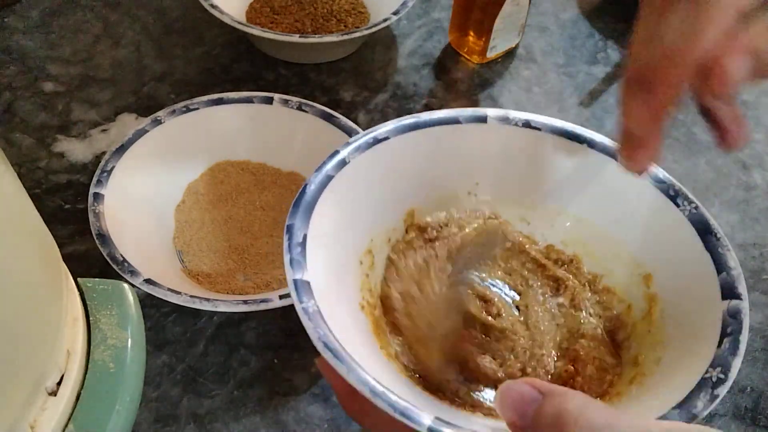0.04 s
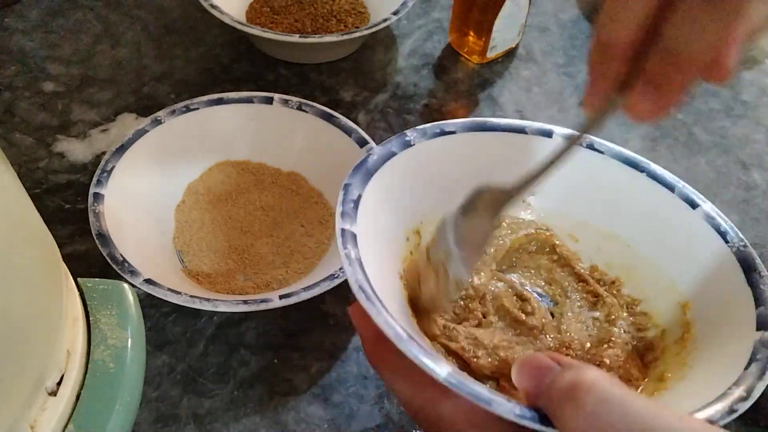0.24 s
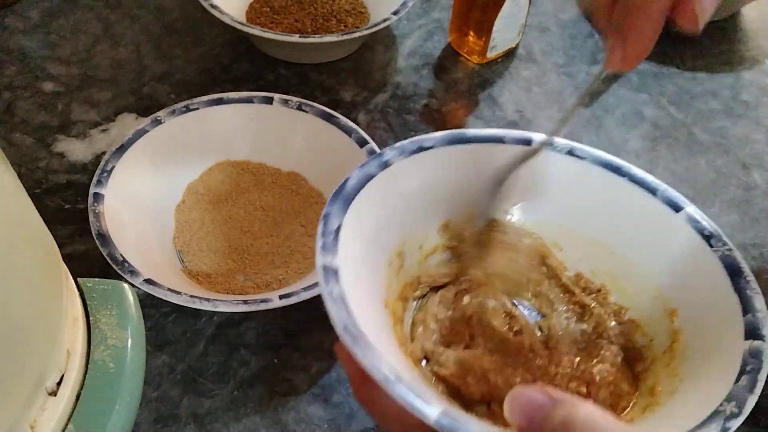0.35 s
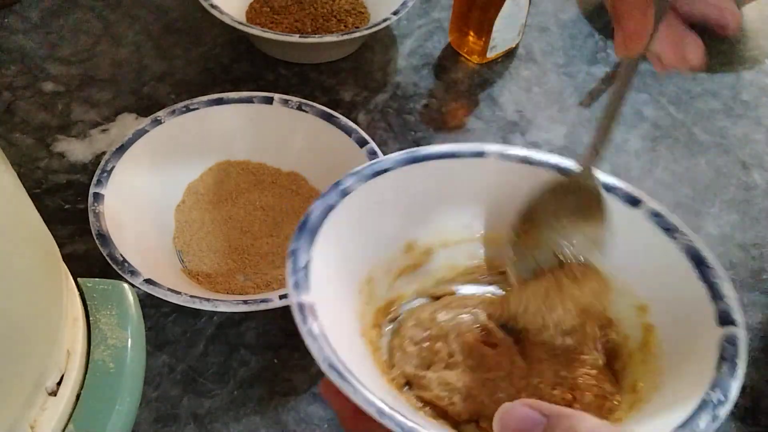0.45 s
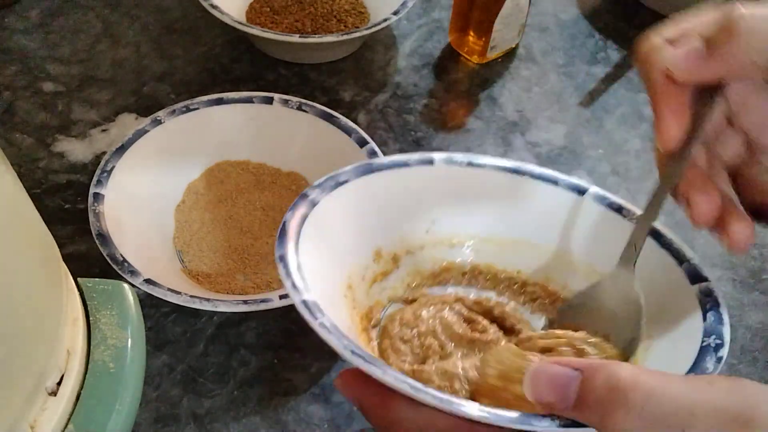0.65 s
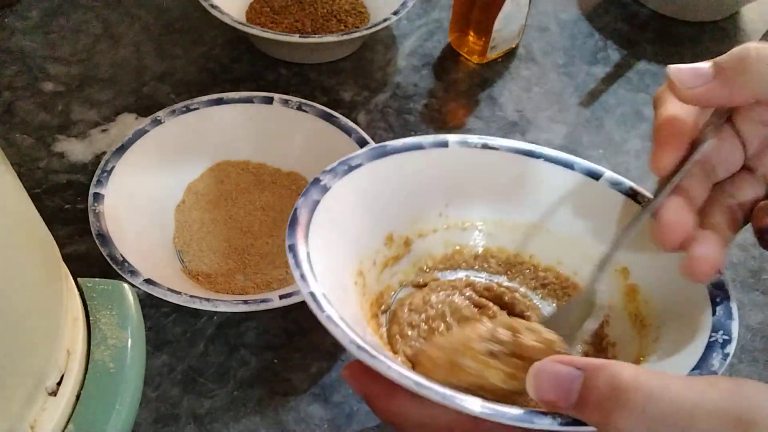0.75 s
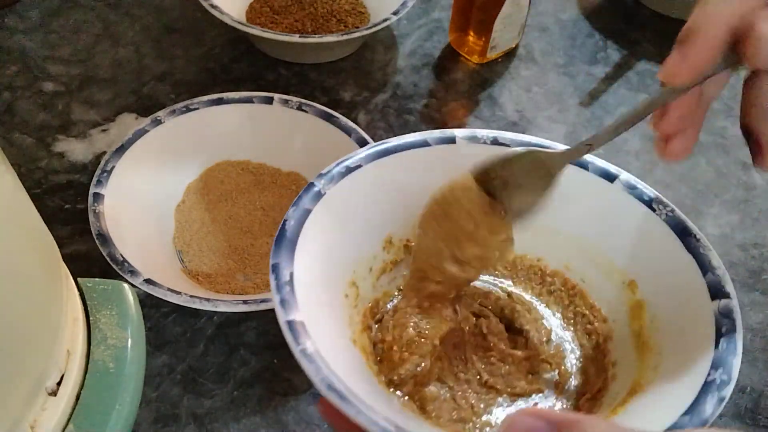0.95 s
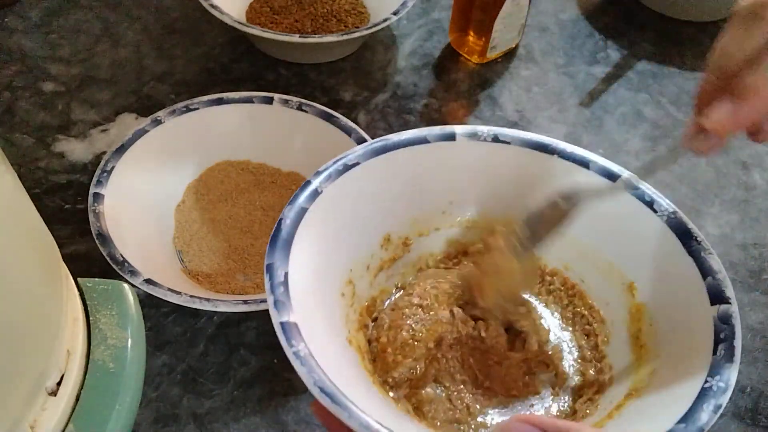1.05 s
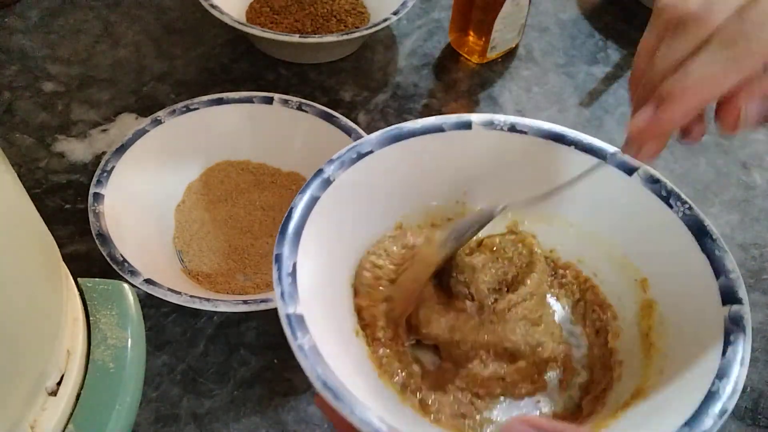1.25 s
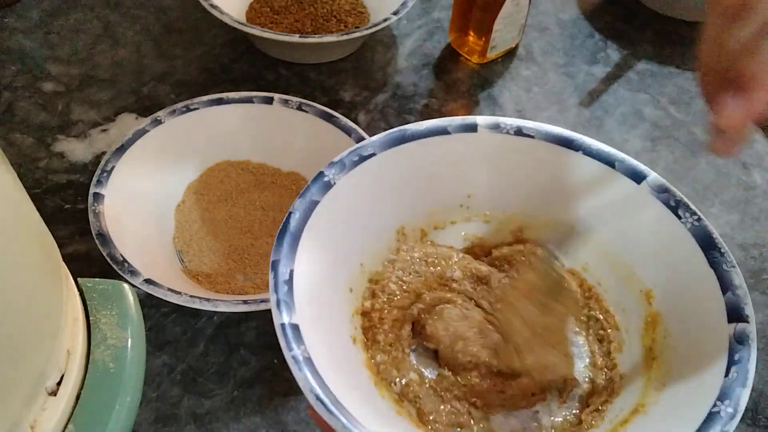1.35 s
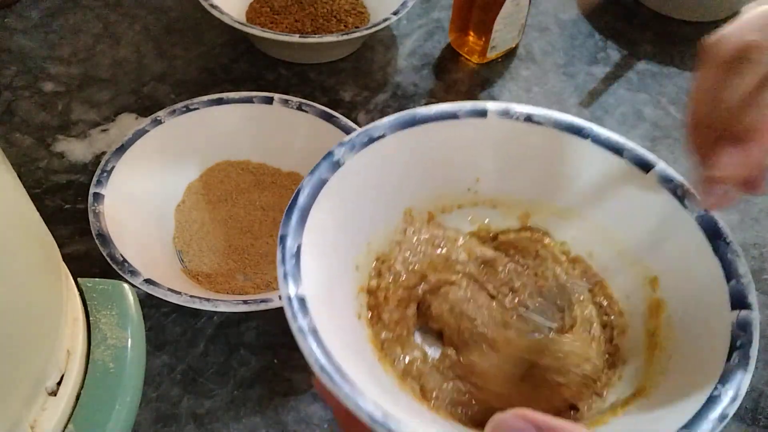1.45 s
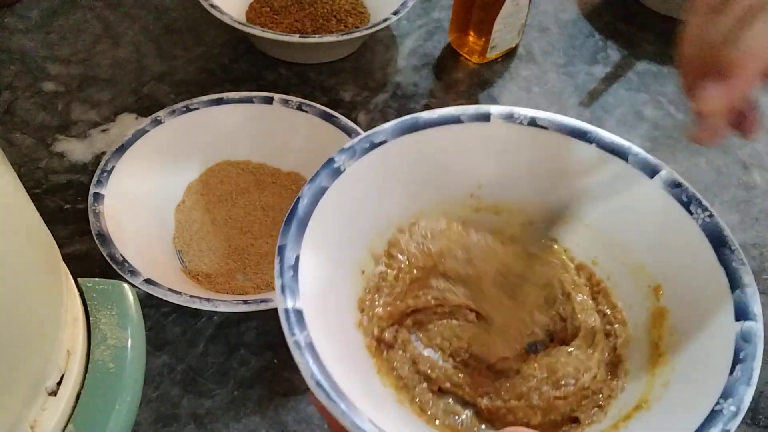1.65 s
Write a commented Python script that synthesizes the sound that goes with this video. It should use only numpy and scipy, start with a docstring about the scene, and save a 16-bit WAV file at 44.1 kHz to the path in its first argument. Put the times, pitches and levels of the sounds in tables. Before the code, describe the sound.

A metal spoon stirs thick paste in a ceramic bowl, scraping softly and knocking twice.

```python
"""A small hard-walled kitchen, one microphone close to a steel spoon stirring paste in a ceramic bowl.
The edge rubs the glaze in a rising rasp; at 0.2 s the spoon knocks and chatters on the hand-damped bowl.
Gritty paste hisses under the next strokes, among squeaks, two more rasps and two light grazes of the tip.
Near 1.1 s a lump squelches free and the spoon knocks again, leaving a brief ring.
The paste smacks and air pockets pop in it."""
import sys
import numpy as np
from scipy import signal
from scipy.fft import rfft, irfft, next_fast_len
from scipy.io import wavfile
from scipy.ndimage import map_coordinates

SR = 44100
rng = np.random.default_rng(int(sys.argv[2]) if len(sys.argv) > 2 else 0)


def transcribe(signal):
    """Save signal, clipped to [-1, 1], as a 16-bit WAV file at the path in sys.argv[1]."""
    frames = np.atleast_2d(signal).T
    limited = np.clip(frames, -1, 1)
    pcm = np.round(limited * 32767).astype(np.int16)
    wavfile.write(sys.argv[1], SR, pcm)


N = 74970
TIME = np.arange(N) / SR

# the bowl's modes (frequency [Hz], level when knocked [dB], level when grazed [dB], t60 [s])
BOWL_MODES = [(452.5, -14.5, -37, .12), (684, -18, -29, 0.12), (762, -1.5, -6, 0.065),
              (1199, 1.5, -2, 0.079), (1469.6, 6, -22, 0.068), (1890, -8.5, 1, 0.056),
              (2375, -10, -12, 0.029), (2940, -24, 5, 0.036), (3461, -30.5, 5.5, 0.073),
              (4910, -25.5, -8, .07), (8130, -39.5, 8, 0.043)]


def amp(db):
    """Decibels to gain."""
    return 10 ** (np.asarray(db) / 20)


def unit(x):
    """Scale to rms 1."""
    return x / np.sqrt(np.mean(np.abs(x) ** 2) + 1e-20)


def along(points, hz):
    """Read a curve of (frequency [Hz], value) points on a log frequency axis."""
    f, v = np.transpose(points)
    return np.interp(np.log(hz + 1), np.log(f + 1), v)


def filtered(x, response):
    """Filter x by a gain given as a function of frequency."""
    size = next_fast_len(N + SR // 2)
    return irfft(rfft(x, size) * response(np.fft.rfftfreq(size, 1 / SR)), size)[:N]


def coloured(x, spectrum):
    """x with a (frequency [Hz], level [dB]) colour, at rms 1."""
    return unit(filtered(x, lambda hz: amp(along(spectrum, hz))))


def wobble(rate):
    """A smooth random curve, rate knots a second."""
    return map_coordinates(rng.standard_normal(int(N * rate / SR) + 4), [TIME * rate])


def add(track, s, x):
    """Mix x into the track at time s."""
    part = track[round(s * SR):][:len(x)]
    part += x[:len(part)]


def pulse(gain_db, size):
    """The causal pulse with this spectrum, at energy 1."""
    cepstrum = irfft(np.log(amp(gain_db)), size)
    cepstrum[1:size // 2] *= 2
    cepstrum[size // 2 + 1:] = 0
    x = irfft(np.exp(rfft(cepstrum)), size)
    return x / np.linalg.norm(x)


def resonance(hz, width_hz):
    """Noise in a steep-sided resonance that may move."""
    band = 1 / (1 + (2 * np.fft.rfftfreq(N, 1 / SR) / width_hz) ** 6)
    slow_noise = lambda: irfft(rfft(rng.standard_normal(N)) * band, N)
    phase = 2 * np.pi * np.cumsum(hz * np.ones(N)) / SR
    return unit(slow_noise() * np.cos(phase) + slow_noise() * np.sin(phase))


def swell(t, rise, fall, range_db=17):
    """A gain that peaks at t = 0 and is range_db down at -rise and at +fall."""
    from_peak = np.abs(t / np.where(t < 0, rise, fall))
    return amp(-range_db * np.minimum(from_peak ** 1.63, 10))


def crackle(per_s=1100):
    """Tiny clicks in the paste, random in time and strength."""
    return rng.standard_normal(N) * (rng.random(N) < per_s / SR)


def shell(size=2048, t60_s=0.032):
    """The short ring of the bowl's many close modes, at energy 1."""
    x = rng.standard_normal(size) * amp(-60 * np.arange(size) / SR / t60_s)
    return x / np.linalg.norm(x)


def ring(levels_db, size=8192):
    """The bowl's distinct modes, damped by hand and paste."""
    t = np.arange(size) / SR
    return sum(amp(db - 60 * t / t60) * np.sin(2 * np.pi * hz * t)
               for db, (hz, _, _, t60) in zip(levels_db, BOWL_MODES))


def room_tone(level_db=-75.5):
    """The quiet kitchen's steady noise at the microphone."""
    # its spectrum (frequency [Hz], relative density [dB])
    colour = [(45, -18), (120, 3), (200, -11), (320, -1), (1300, -9.5), (2200, -9), (4000, -27),
              (6600, -7.5), (9500, -21)]
    return amp(level_db) * coloured(rng.standard_normal(N), colour)


def room_tail(x, build_s=0.0076):
    """The diffuse tail off the hard walls; it lasts longest near 3.5 kHz."""
    # the kitchen's decay (frequency [Hz], t60 [s])
    decay_times = [(400, 0.34), (3500, 0.46), (10000, 0.36)]
    hz, t, noise = signal.stft(rng.standard_normal(SR * 3 // 4), SR, nperseg=256)
    decay = amp(-60 * t / along(decay_times, hz)[:, None])
    build_up = 1 - np.exp(-t / build_s)
    _, tail = signal.istft(noise * decay * build_up, SR, nperseg=256)
    return signal.fftconvolve(x, tail / np.linalg.norm(tail))[:N]


def pops(half_width_octaves=0.2, t60_s=0.014):
    """Tiny air pockets snap open in the paste."""
    # air pockets (time [s], level [dB], pitch [Hz])
    pockets = [(1.225, -53, 12770), (1.443, -61.5, 14260)]
    out = np.zeros(N)
    for s, db, hz in pockets:
        band = lambda f: 1 / (1 + (np.log2((f + 1) / hz) / half_width_octaves) ** 2)
        snap = unit(filtered(rng.standard_normal(N), band))
        add(out, s, amp(db - 60 * TIME / t60_s) * snap)
    return out


def smacks(attack_s=0.005, t60_s=0.085):
    """Sticky strands tear in brief bursts, each crackling through one steep-sided resonance."""
    # paste parting from the spoon (time [s], level [dB], pitch [Hz], width [Hz])
    partings = [(0.102, -52.5, 1900, 298), (.633, -53.5, 3600, 700), (.653, -58.5, 2200, 350),
                (1.133, -47.5, 2440, 480), (1.331, -65.5, 4670, 253), (1.338, -67.5, 3200, 437),
                (1.404, -70.5, 2726, 149), (1.442, -66.5, 4820, 414), (1.444, -66.5, 1130, 99),
                (1.554, -68, 720, 108.2), (1.645, -67, 4600, 302), (1.661, -63, 2650, 152),
                (1.667, -60.5, 3200, 500), (1.671, -63.5, 574, 68.8)]
    out = np.zeros(N)
    envelope = np.minimum(TIME / attack_s, amp(-60 * (TIME - attack_s) / t60_s))
    for s, db, hz, width in partings:
        smack = filtered(envelope * crackle(), lambda f: (1 + 1j * (f - hz) / width) ** -3)
        add(out, s, amp(db) * smack * np.linalg.norm(envelope) / np.linalg.norm(smack))
    return out


def squelch(width_hz=333):
    """The cavity behind a lump drops in pitch as the lump comes free, then climbs as the hollow closes."""
    # the cavity's resonance (time [s], level [dB], pitch [Hz])
    cavity = [(1.1, -96, 750), (1.111, -68.5, 784), (1.132, -55.5, 845), (1.145, -47, 605),
              (1.155, -48.5, 904), (1.172, -54, 982), (1.232, -81, 1032), (1.32, -99.5, 1053)]
    s, db, hz = np.transpose(cavity)
    gain = np.interp(TIME, s, amp(db), left=0, right=0)
    return gain * resonance(np.interp(TIME, s, hz), width_hz)


def hiss(grain_share=0.6, rough_db=1.5):
    """Each swipe drags grit over another spot of the bowl: dense grains on noise, ringing in its shell."""
    # swipes through the paste (peak time [s], rise [s], fall [s], low [dB], middle [dB], high [dB])
    swipes = [(0.022, 0.057, 0.067, -71.5, -81, -83), (.335, 0.027, 0.031, -56, -54.5, -65),
              (0.508, 0.17, 0.056, -56, -60.5, -70.5), (0.641, 0.1, 0.085, -59.5, -69, -80.5),
              (.704, 0.1, 0.085, -62.5, -64, -75), (1.14, 0.037, 0.11, -60.5, -68.5, -83),
              (1.485, 0.093, 0.13, -91, -73.5, -88)]
    # colours of the grit's three bands (frequency [Hz], level [dB])
    low = [(1700, -29), (2700, -1.5), (3400, -1), (4100, -9.5), (4750, -6), (5500, -10), (6500, -29.5)]
    middle = [(4800, -33.5), (5800, -6), (6800, 7), (7600, -0.5), (8250, -1), (9000, -7), (10500, -41.5)]
    high = [(7500, -32), (9200, 12), (11000, 22), (12500, 17), (15500, 15)]
    bands = np.zeros((3, N))
    for s, rise, fall, *levels_db in swipes:
        grains = np.sqrt(grain_share) * unit(crackle())
        noise = np.sqrt(1 - grain_share) * rng.standard_normal(N)
        grit = signal.fftconvolve(grains + noise, shell())[:N]
        for band, db, colour in zip(bands, levels_db, (low, middle, high)):
            band += amp(db) * swell(TIME - s, rise, fall) * coloured(grit, colour)
    return sum(band * amp(rough_db * wobble(rate=69.96)) for band in bands)


def squeaks_and_ring(rise_share=0.44):
    """The spoon's squeaks on the glaze, and a ring near 1.8 kHz after the second knock."""
    # brief narrow resonances (peak time [s], level [dB], length [s], pitch [Hz], width [Hz])
    brief_resonances = [(-0.003, -56, 0.27, 1437, 67.4), (0.322, -50.5, 0.18, 943.4, 610),
                        (0.485, -62.5, 0.18, 3450, 181), (0.52, -59.5, .1, 4820, 590),
                        (0.693, -63.5, 0.21, 2308, 260), (0.171, -70, 0.15, 6590, 1010),
                        (0.76, -52, 0.093, 1547, 90), (1.033, -74, 0.23, 2273, 87),
                        (1.145, -63, 0.054, 4770, 264), (1.17, -62.5, 0.22, 1810, 80),
                        (1.328, -69.5, 0.14, 6700, 800)]
    out = np.zeros(N)
    for s, db, length, hz, width in brief_resonances:
        envelope = swell(TIME - s, rise_share * length, (1 - rise_share) * length)
        out += amp(db) * envelope * resonance(hz, width)
    return out


def rasps(glide_hz_per_s=550, upper_width_hz=272):
    """The edge sticks and slips on the glaze; its lower resonance climbs through each stroke."""
    # strokes of the edge (peak time [s], level [dB], rise [s], fall [s], pitch [Hz], width [Hz],
    # upper resonance [Hz], its relative level [dB])
    strokes = [(0.141, -55, 0.12, 0.34, 1983, 470, 2680, -7.5),
               (0.459, -53.5, 0.26, 0.13, 1653, 432, 2840, -25),
               (0.832, -52, 0.097, 0.24, 1684, 378, 2848, -13.5)]
    out = np.zeros(N)
    for s, db, rise, fall, hz, width, upper_hz, upper_db in strokes:
        t = TIME - s
        lower = resonance(hz + glide_hz_per_s * t, width)
        upper = amp(upper_db) * resonance(upper_hz, upper_width_hz)
        out += amp(db) * swell(t, rise, fall) * unit(lower + upper)
    return out


def grazes(attack_s=0.0027):
    """The tip touches the bowl through the paste: a soft ring with no thud."""
    # light touches (time [s], level [dB])
    touches = [(.611, -54.5), (.634, -57.5)]
    out = np.zeros(N)
    modes = ring([grazed for _, _, grazed, _ in BOWL_MODES])
    onset = 1 - np.exp(-np.arange(len(modes)) / SR / attack_s)
    for s, db in touches:
        add(out, s, amp(db) * onset * modes)
    return out


def knocks(size=8192, clatter_db=-6, low_cut_hz=250):
    """The spoon chatters on the bowl: each contact is a dull push, a clatter of the shell and a ring."""
    # contacts of spoon and bowl (time [s], level [dB], relative push [dB], relative ring [dB])
    contacts = [(.2170, -10, 6, -30.5), (.2196, -13, 6, -28.5), (0.2224, -16, 2.5, -39),
                (0.24, -25.5, -11.5, -25.5), (1.135, -39, 0.5, -18), (1.1458, -33.5, 4, -20.5)]
    # the damped bowl's answer to one contact (frequency [Hz], level [dB])
    thud = [(220, -44), (330, -7), (520, -1.5), (800, 3.5), (1200, 0), (1550, 0), (2000, -5.5),
            (2800, -9.5), (3800, -20.5), (7500, -27.5), (16000, -60)]
    out = np.zeros(N)
    push = pulse(along(thud, np.fft.rfftfreq(size, 1 / SR)), size)
    modes = ring([knocked for _, knocked, _, _ in BOWL_MODES])
    for s, db, push_db, ring_db in contacts:
        clatter = signal.fftconvolve(push, shell())[:size]
        knock = amp(push_db) * push + amp(clatter_db) * clatter + amp(ring_db) * modes
        add(out, s, -amp(db) * knock)
    low_cut = signal.butter(4, low_cut_hz, "highpass", fs=SR, output="sos")  # the bowl radiates no bass
    return signal.sosfilt(low_cut, out)


def scene():
    """Spoon, bowl and paste close to the microphone, the kitchen behind them."""
    bowl = knocks() + grazes()
    stirring = rasps() + squeaks_and_ring() + hiss() + squelch() + smacks() + pops()
    echo = room_tail(amp(-7) * bowl + amp(-11) * stirring)  # sounds deep in the bowl reach the room less
    return (bowl + stirring + echo + room_tone())[None]


def record(dry, top_hz=15700):
    """The mono recorder keeps nothing above its band limit."""
    return filtered(dry[0], lambda hz: hz < top_hz)[None]


dry = scene()
out = record(dry)
transcribe(out)
```